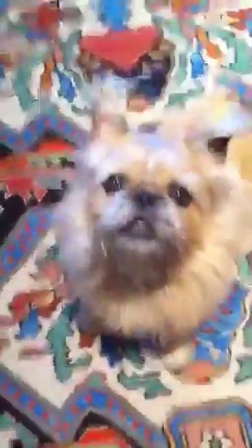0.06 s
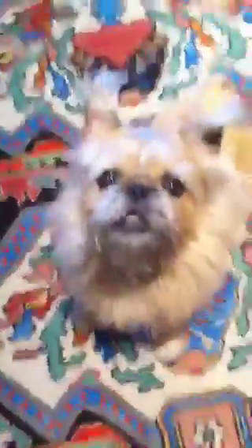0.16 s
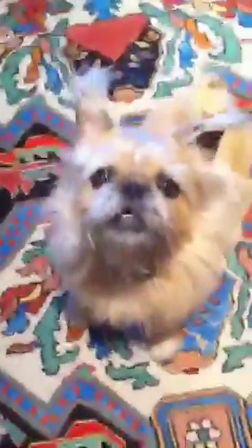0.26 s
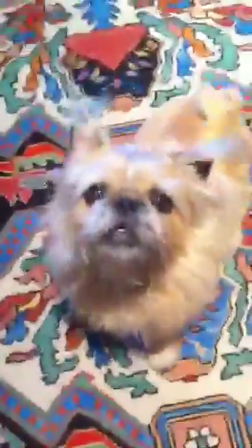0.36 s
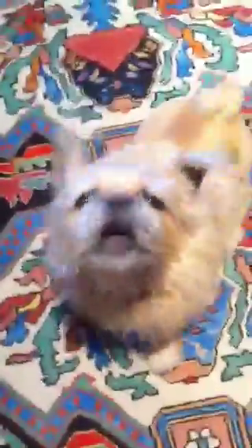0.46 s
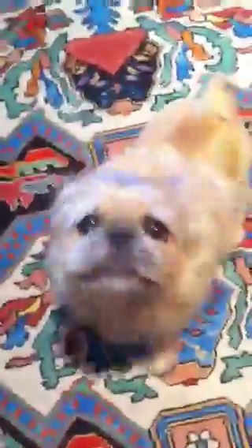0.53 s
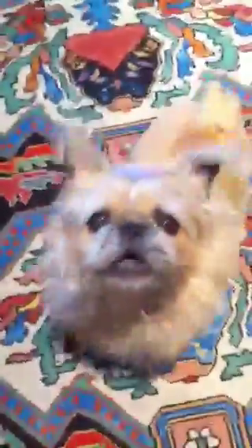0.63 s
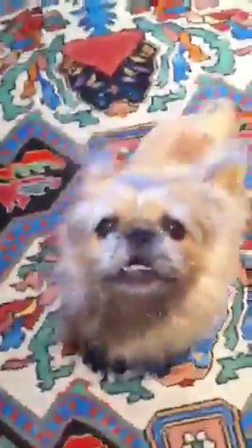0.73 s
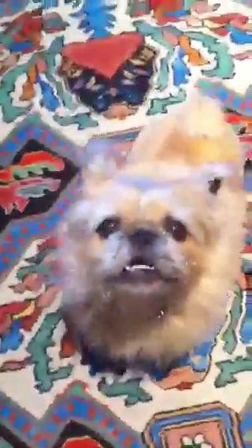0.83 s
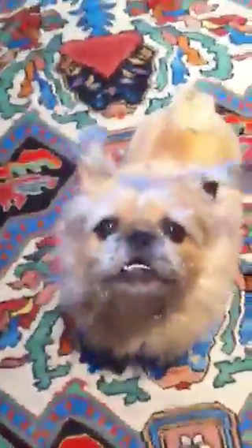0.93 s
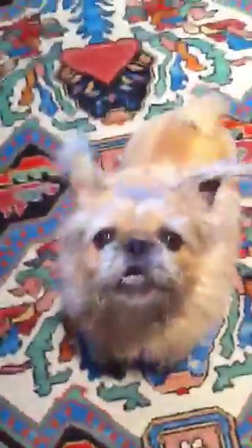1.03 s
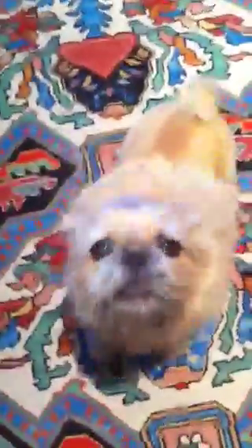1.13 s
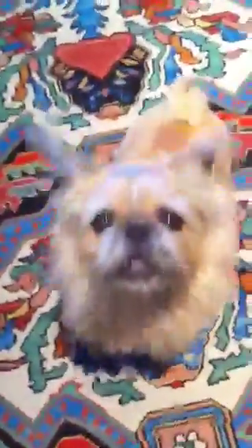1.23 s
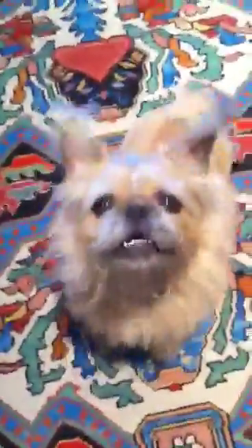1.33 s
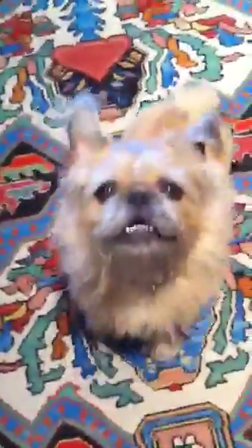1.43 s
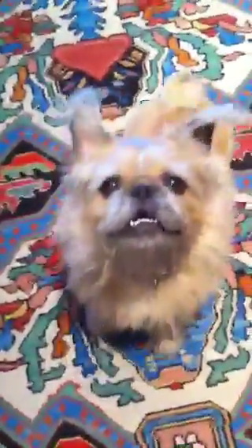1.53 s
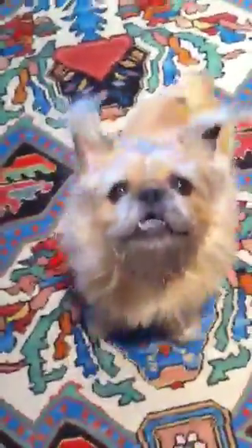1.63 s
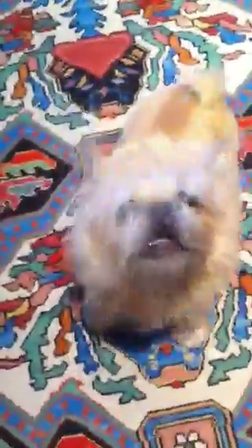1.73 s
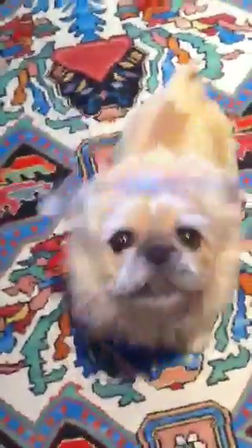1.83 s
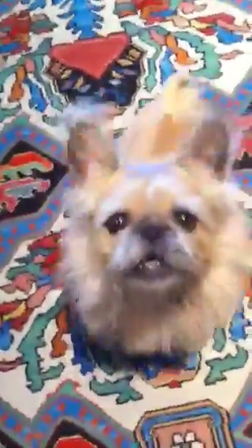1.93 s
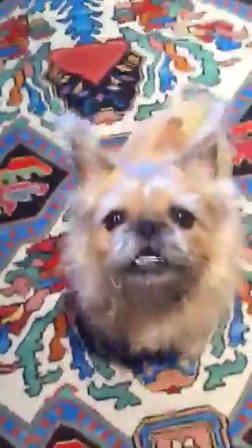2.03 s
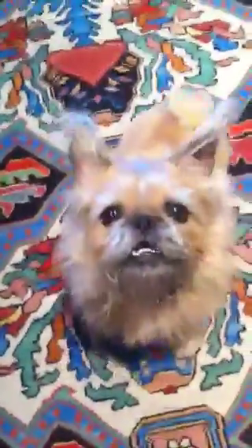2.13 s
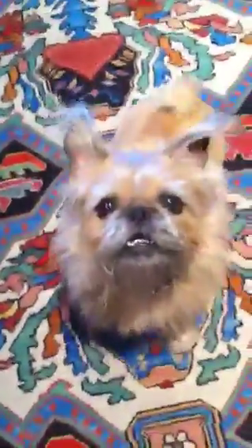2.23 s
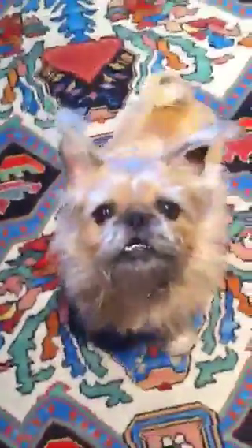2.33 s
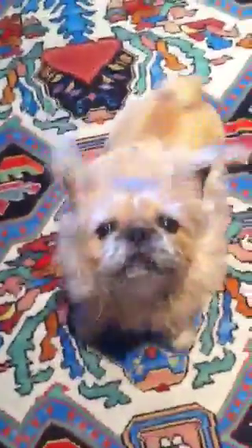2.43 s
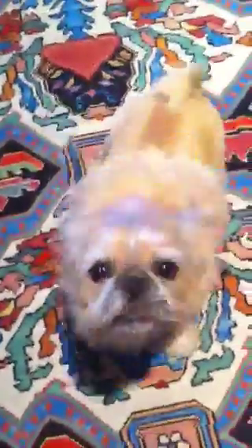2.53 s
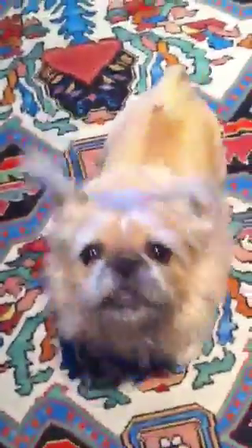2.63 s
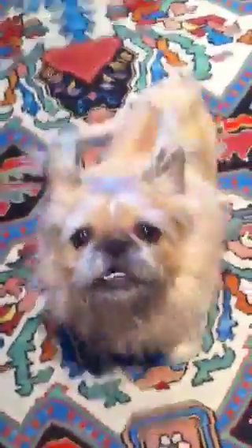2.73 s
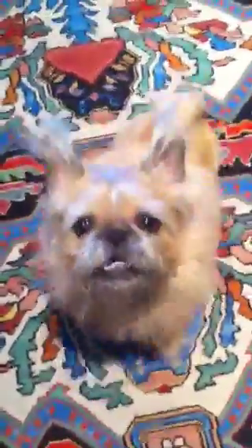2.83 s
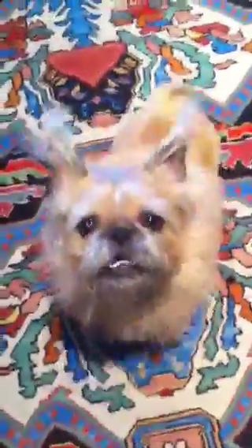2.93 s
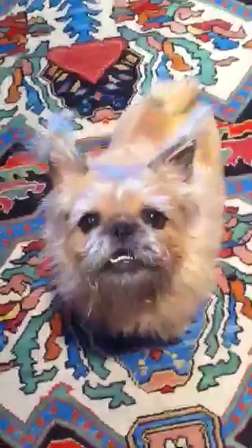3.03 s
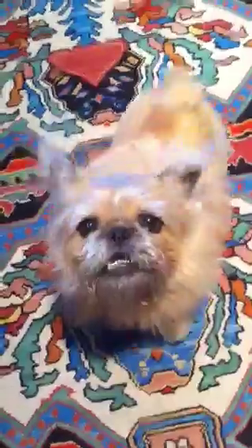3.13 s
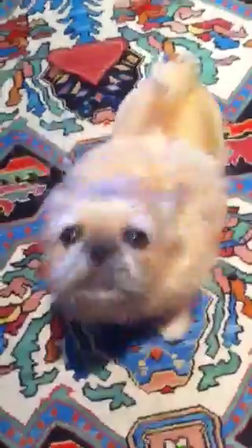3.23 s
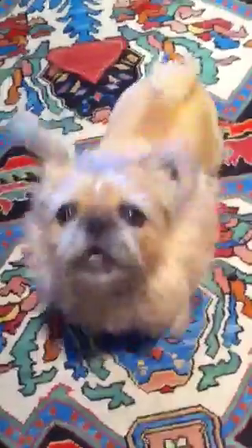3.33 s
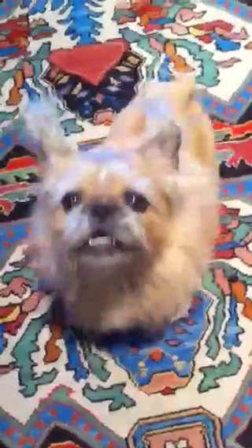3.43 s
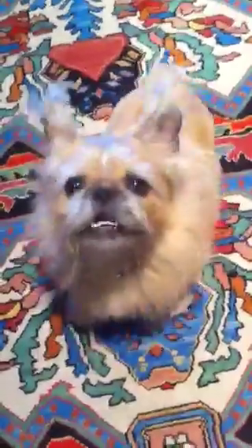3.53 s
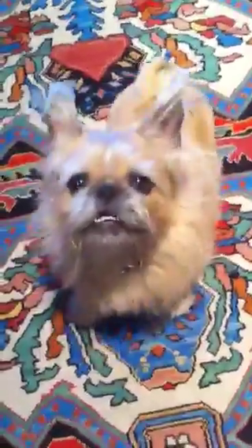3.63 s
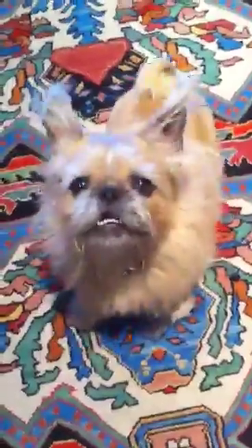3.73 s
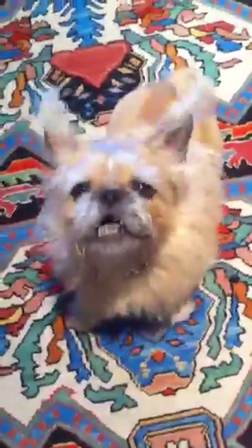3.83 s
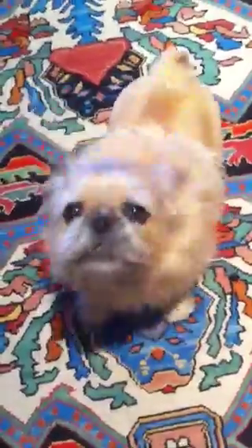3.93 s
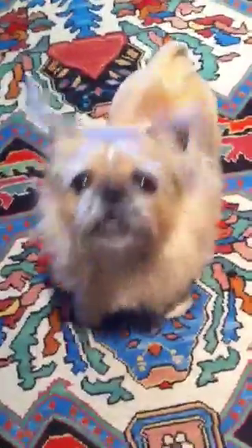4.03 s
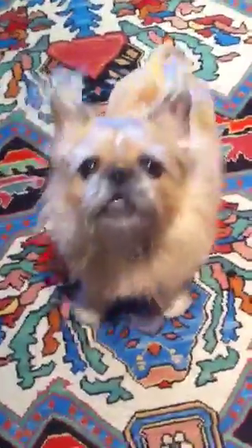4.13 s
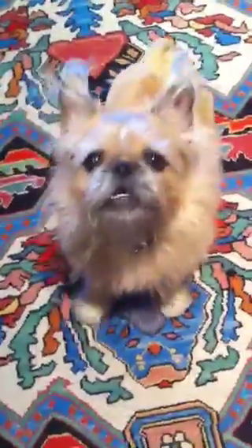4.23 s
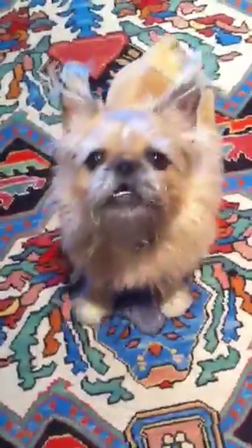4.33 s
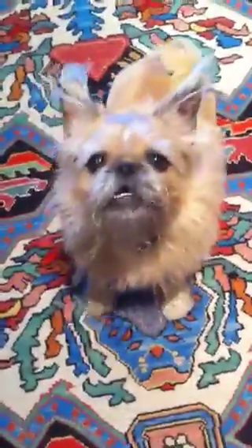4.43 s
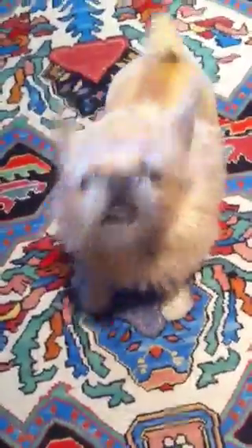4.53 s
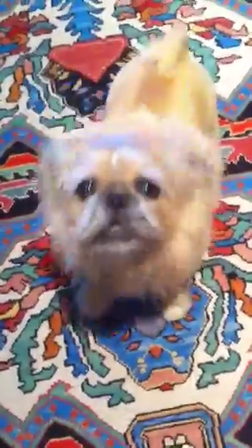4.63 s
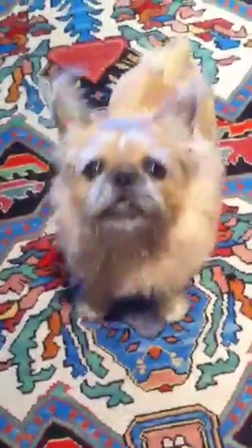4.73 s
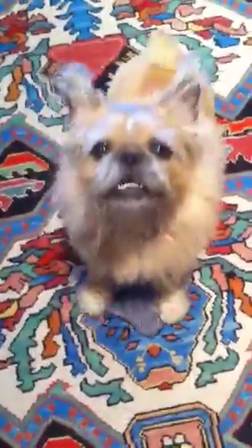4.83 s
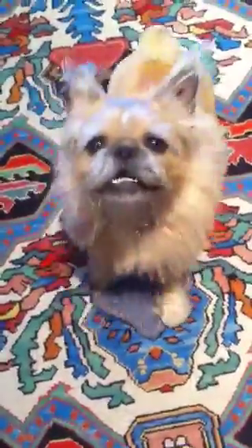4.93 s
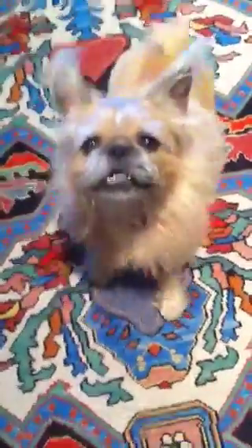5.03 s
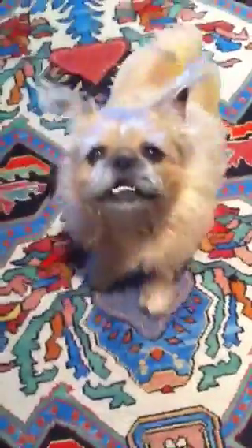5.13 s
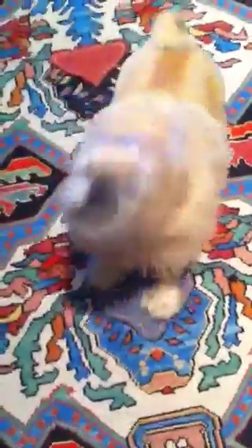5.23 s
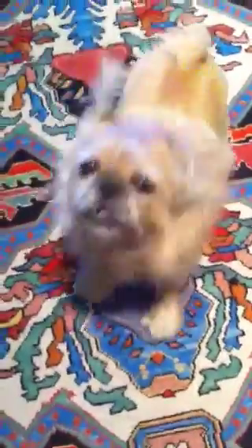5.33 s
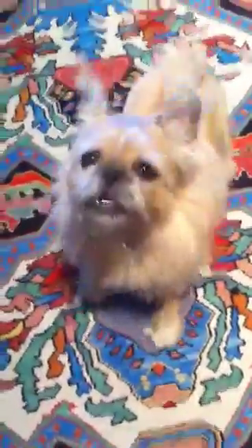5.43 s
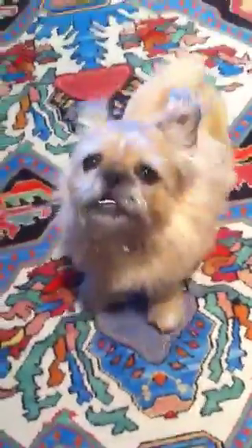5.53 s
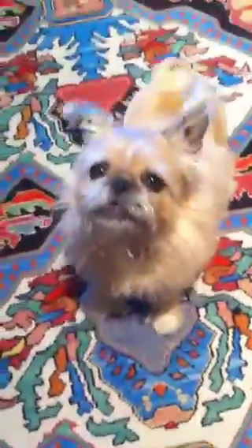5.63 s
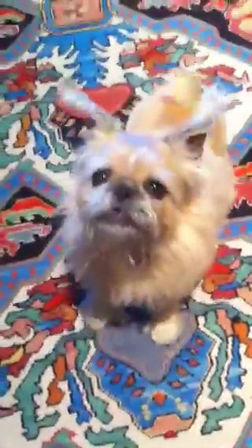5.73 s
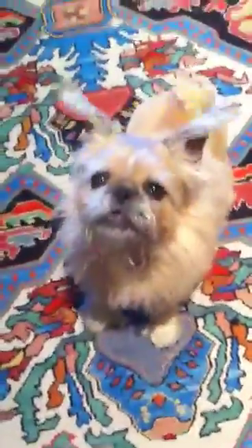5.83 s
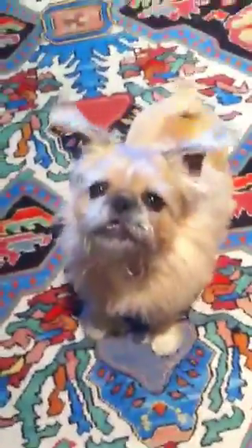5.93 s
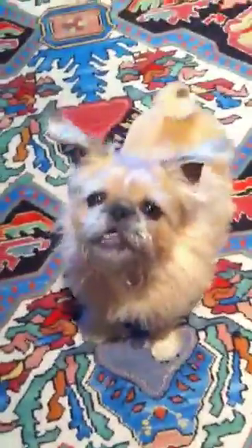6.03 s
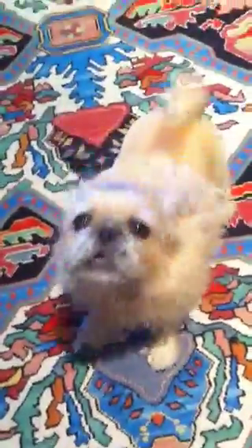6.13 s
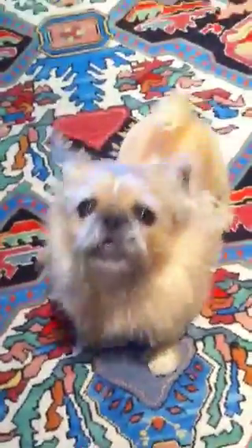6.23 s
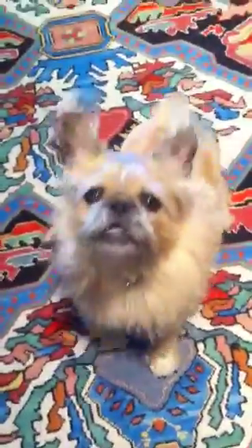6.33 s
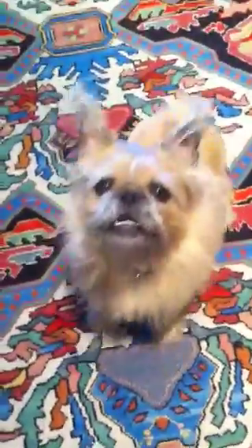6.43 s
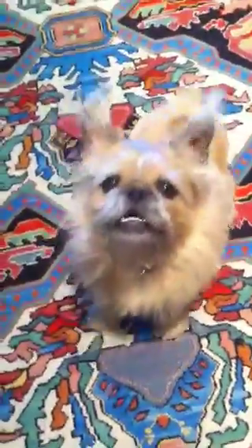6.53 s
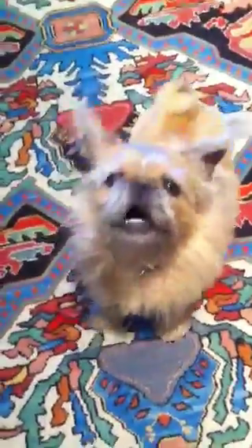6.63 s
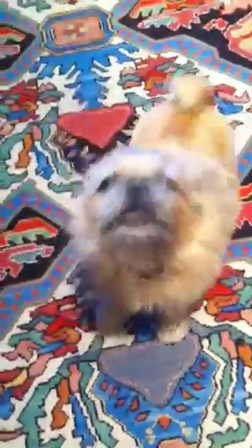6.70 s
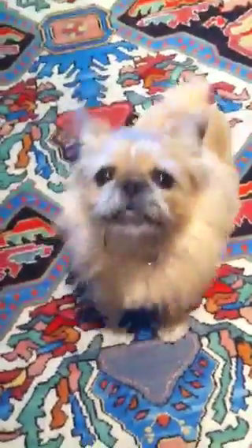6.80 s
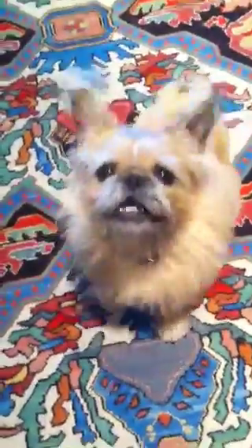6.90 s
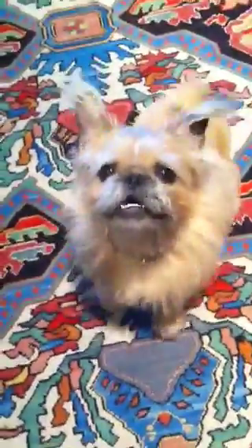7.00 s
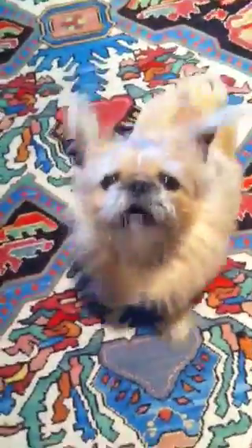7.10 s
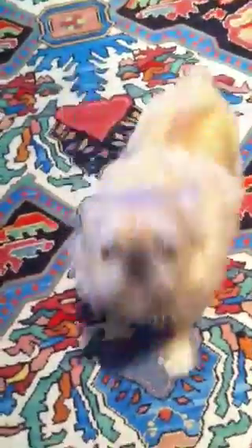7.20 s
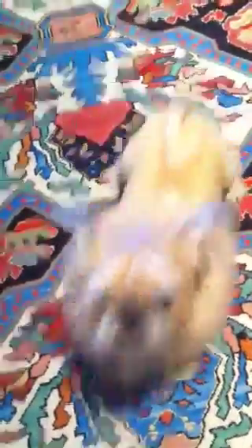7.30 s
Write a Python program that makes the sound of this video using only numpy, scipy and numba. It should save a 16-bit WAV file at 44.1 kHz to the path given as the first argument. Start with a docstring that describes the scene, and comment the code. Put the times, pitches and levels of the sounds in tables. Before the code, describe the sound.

A small flat-faced dog barks sharply and hoarsely eleven times in a live room, with thin squeaks before most barks and soft rug rustling.

```python
"""A tail from a bark just before the start opens the scene; brushing noise and a room hum run throughout.
From 0.4 to 5 s seven thin reedy squeaks (partial stacks) come close up, most leading into a bark.
From 0.55 s a small flat-faced dog barks eleven times in a live, hard-walled room: pulses ring throat and mouth.
From 0.9 s snuffles (noise through nasal resonances) and dull paw taps fill gaps; peaks are squeezed flat."""
import sys
import numpy as np
from scipy import signal
from scipy.fft import rfft, irfft
from scipy.io import wavfile
from scipy.ndimage import uniform_filter1d
from numba import njit

SR = 44100
rng = np.random.default_rng(int(sys.argv[2]) if len(sys.argv) > 2 else 0)


def master_out(mix):
    """Clip the mix to full scale and print it as 16-bit PCM to the path in sys.argv[1]."""
    frames = np.transpose(np.atleast_2d(mix))
    ceiling = np.clip(frames, -1, 1)
    pcm = np.round(ceiling * 32767).astype(np.int16)
    wavfile.write(sys.argv[1], SR, pcm)


def field_ratio(decibels):
    """Amplitude ratio for a level in dB (20 dB per decade); scalars and array-likes work."""
    return 10 ** (np.asarray(decibels, dtype=float) / 20)


N = 324576
LEAD = SR // 2    # samples computed ahead of the start

# barks: (time [s], fade from end of low-bark climb to end of bark [dB], pitch after opening climb [Hz],
#         closing throat resonance [Hz], gape [0-1])
BARKS = [(0.55, -9.5, 487.1, 867.5, 0.29), (1.172, -20, 488, 1201, 0.3), (1.814, -14, 514, 1173, 0.64),
         (2.549, -6, 930, 1177, 0.55), (3.284, -13.5, 953.4, 904, 1), (3.959, -9, 498.8, 1212, 0.39),
         (4.612, -10, 500.5, 913.3, 0.31), (5.302, -12.5, 581, 1193, 0.94), (6.174, -7.5, 486, 857, .4),
         (6.751, -6, 501, 1155, .7), (7.221, -6.5, 765, 1136, .8)]
# fixed throat resonances: (centre [Hz], width per pass [Hz], level before edge or chest lift [dB])
THROAT_MODES = [(617.8, 128, -5.5), (737.6, 328, -6.5), (3310, 1360, -9), (4250, 5900, -49)]
# upper resonance sinking as the jaws close: (time into bark [s], centre [Hz])
EDGE_FALL = [(.025, 3000), (.06, 2300)]
# air hissing past the teeth: (mean centre [Hz], level before roughness and flutter [dB])
RASP = [(6200, -41.5), (8600, -36.5), (11000, -39.5), (13500, -40.5)]
# squeaks: (time [s], length [s], top pitch [Hz], end pitch [Hz], sag exponent [1 usual, more = earlier])
SQUEAKS = [(0.394, .078, 1239, 1055, 1), (1.417, .093, 1428, 1055, 1.3), (2.134, .086, 1185, 1035, .9),
           (2.853, .087, 1287, 1030, .8), (3.651, .069, 1175, 1045, 1), (4.36, .09, 1290, 1075, 1),
           (4.991, .099, 1180, 1080, 3.5)]
# squeak course after its start: (share of length [0-1], share of way from end to top pitch [0-1],
#                                 level re squeak peak [dB])
SQUEEZE = [(.21, 1, 0), (.45, .74, -1), (.72, .34, -3), (1, 0, -11)]
# squeak colour: (frequency [Hz], relative level [dB])
REED_COLOUR = [(1000, 11), (1500, 0), (2400, -26), (3600, -9), (4700, 2.5), (6200, -13.5), (8300, -2.5),
               (10000, -17.5), (12000, -6.5), (15500, -23.5)]
# snuffles through the short nose: (time [s], length [s], level before ramps [dB])
SNUFFLES = [(0.898, 0.29, -77), (1.72, 0.18, -58.5), (2.365, 0.12, -56.5), (3.138, 0.14, -49)]
# nasal resonances: (centre [Hz], width per pass [Hz], relative level [dB])
NOSE_MODES = [(1214, 600, -10), (2000, 700, -9), (2650, 500, -9), (3400, 700, -8)]
# fur and paws on the rug: (time [s], length [s], level before flutter [dB])
RUSTLES = [(0.28, 0.63, -58.5), (0.78, 0.46, -56.5), (1.156, 0.55, -59), (1.527, .4, -59),
           (1.901, 0.16, -57), (2.579, 0.35, -56), (2.9, 0.47, -60), (3.327, .3, -57.5), (4.065, 0.34, -69),
           (4.689, 0.33, -56.5), (4.98, .36, -55.5), (5.51, 0.29, -64.5), (5.9, 0.15, -73),
           (6.257, 0.29, -54), (6.531, 0.22, -60), (7.088, 0.15, -61.5)]
# rustle spectrum: (frequency [Hz], relative density [dB per Hz])
RUSTLE_COLOUR = [(900, -23), (1500, 5.5), (2300, 5), (4200, -6), (7700, -6), (16000, -8)]
# paw taps: (time [s], peak level [dB], lower resonance [Hz])
TAPS = [(0.897, -34.5, 860), (5.15, -41, 2370), (5.194, -40.5, 735), (5.252, -40, 730),
        (6.028, -52.5, 1150), (6.667, -34, 780)]
# hum spectrum: (frequency [Hz], relative density [dB per Hz])
HUM_COLOUR = [(30, -30.5), (90, -18), (120, 1.4), (150, -6), (260, -5.5), (420, -5.5), (1100, -13.5),
              (1500, -25), (3000, -45.5)]
# room decay: (frequency [Hz], time to fall 60 dB [s])
ROOM_T60 = [(250, 0.56), (550, 0.76), (1200, 0.75), (2500, 0.6), (5000, 0.52), (12000, 0.34)]

EARLIER_BARK_S, EARLIER_BARK_DB = -0.78, -2    # copy of the first bark's settings, re that bark
BARK_S, BARK_DB = 0.096, -9
LOW_CLIMB_S, SETTLE_S, SHUT_S = .028, .054, .075    # low bark: climb ends, half settled, settled
HIGH_CLIMB_S, BREAK_S, CLEAR_S = .029, .038, .022    # high bark: climb ends, pitch breaks, roughening delay
BREAK_HZ, SLOW_START_DB, CLIMB_EDGE_DB = 650, -9, 9    # barks climbing above this start softly, sharp, clear
START_SHARE, START_MAX_HZ = .86, 513.2    # starting pitch: share of climbed pitch, limit
SETTLED_SHARE = .51    # settled pitch re closing throat resonance
THROAT_START_SHARE, THROAT_LOCK, THROAT_MIN_HZ = 0.915, 0.95, 930
MOUTH_SHUT_HZ, MOUTH_GAPE_HZ = 1390, 810    # shut, and lift at full gape
EDGE_DB, EDGE_GAPE_DB, EDGE_FADE_DB = -14.5, 7, -6.5    # base, lift at full gape, change over the bark
REED_DB, REED_DB_PER_HZ, REED_MAX_DB = -43.5, 0.14, -38    # before colour; harder squeeze = higher, louder
REED_START_HZ, REED_START_SHARE, REED_START_DB = 1160, .3, -3
STILL_DB, STROKE_RAMP_SHARE = -69, .45    # rustle between strokes; share of a stroke in each ramp
HUM_DB, ROOM_DB, SQUEAK_ROOM_DB = -61.5, -14.5, -13    # near squeak sends less to the room


def at_hz(points, hz):
    """Read a (Hz, value) table on a log frequency axis."""
    return np.interp(np.log(hz), np.log(np.array(points)[:, 0]), np.array(points)[:, 1])


def rms_one(x):
    """Scale to unit rms."""
    return x / np.sqrt(np.mean(x ** 2) + 1e-20)


def unfold(rows):
    """First sample index and a per-sample curve for each column after time."""
    s, *columns = np.transpose(rows)
    t = np.arange(s[0], s[-1], 1 / SR)
    return round(s[0] * SR) + LEAD, [np.interp(t, s, c) for c in columns]


def wobble(size, hz):
    """Unit-rms noise through two equal low-pass poles at hz."""
    r = np.exp(-2 * np.pi * hz / SR)
    noise = rng.standard_normal(size + 3000)
    return rms_one(signal.lfilter([1], [1, -2 * r, r * r], noise)[3000:])


def coloured(spectrum):
    """Unit-rms noise of the given spectral density."""
    hz = np.maximum(np.fft.rfftfreq(N + LEAD, 1 / SR), 1)
    white = rfft(rng.standard_normal(N + LEAD))
    return rms_one(irfft(white * field_ratio(at_hz(spectrum, hz)), N + LEAD))


def ramps(size, rise_s, fall_s):
    """Sine-squared rise and fall."""
    t = np.arange(size) / SR
    return np.sin(np.pi / 2 * np.clip(np.minimum(t / rise_s, t[::-1] / fall_s), 0, 1)) ** 2


@njit
def resonate(x, hz, width_hz):
    """Two-pole resonance with a moving centre, about unit gain at its peak."""
    y, r = np.zeros(len(x)), np.exp(-np.pi * width_hz / SR)
    for i in range(2, len(x)):
        drive = (1 - r * r) / 2 * (x[i] - x[i - 2])
        y[i] = drive + 2 * r * np.cos(2 * np.pi * hz[i] / SR) * y[i - 1] - r * r * y[i - 2]
    return y


def ring_twice(x, hz, width_hz):
    """Steep fixed resonance: two equal passes."""
    centre_hz = np.full(len(x), float(hz))
    once = resonate(x, centre_hz, float(width_hz))
    return resonate(once, centre_hz, float(width_hz))


def dog():
    """Place all barks; each is a burst of fold pulses shaped by a closing mouth."""
    out = np.zeros(N + LEAD)
    first_s, *first = BARKS[0]
    for k, row in enumerate([(first_s + EARLIER_BARK_S, *first)] + list(BARKS)):
        rows, clear_s = bark_controls(*row)
        start, columns = unfold(rows)
        out[start:start + len(columns[0])] += bark(*columns, clear_s) * field_ratio(EARLIER_BARK_DB * (k == 0))
    return out


def bark_controls(s, fade_db, climbed_hz, closing_hz, gape):
    """Curves of one bark: pitch climbs, then glides to a settled pitch, lower or higher; gape lifts mouth."""
    high = climbed_hz > BREAK_HZ
    low_times = [0, LOW_CLIMB_S, SETTLE_S, SHUT_S, BARK_S]
    t = np.array([0, HIGH_CLIMB_S, BREAK_S, SETTLE_S, BARK_S] if high else low_times)
    after = np.clip((t - LOW_CLIMB_S) / (BARK_S - LOW_CLIMB_S), 0, 1)
    level_db = BARK_DB + fade_db * after + SLOW_START_DB * high * (t == 0)

    settled_hz = SETTLED_SHARE * closing_hz
    start_hz = min(START_SHARE * climbed_hz, START_MAX_HZ)
    third_hz = climbed_hz if high else (climbed_hz + settled_hz) / 2
    pitch_hz = [start_hz, climbed_hz, third_hz, settled_hz, settled_hz]

    partial_hz = climbed_hz * (1 if high else 2)    # the throat follows this partial
    open_hz = max(THROAT_LOCK * partial_hz, THROAT_MIN_HZ)
    throat_hz = [THROAT_START_SHARE * open_hz, open_hz, (open_hz + closing_hz) / 2, closing_hz, closing_hz]

    mouth_hz = MOUTH_SHUT_HZ + MOUTH_GAPE_HZ * gape * np.clip(1 - t / SHUT_S, 0, 1) ** 0.47
    edge_db = EDGE_DB + EDGE_GAPE_DB * gape + EDGE_FADE_DB * t / BARK_S
    edge_db = edge_db + CLIMB_EDGE_DB * high * (t == 0)
    return np.transpose([s + t, level_db, pitch_hz, throat_hz, mouth_hz, edge_db]), CLEAR_S * high


def bark(level_db, pitch_hz, throat_hz, mouth_hz, edge_db, clear_s):
    """Vocal-fold pulses, clear at first and then chaotic, ring the throat and the mouth."""
    size = len(pitch_hz)
    t = np.arange(size) / SR
    rough = np.clip(.2 + (t - clear_s) / .05, .15, .9)    # the folds lose their beat
    folds, breath = fold_source(pitch_hz, rough)

    voice = resonate(folds, throat_hz, 140.)
    voice -= field_ratio(-13 + 5.5 * rough) * resonate(folds, mouth_hz, 420.0)
    edge_hz = np.interp(t, *np.transpose(EDGE_FALL))
    voice += field_ratio(edge_db - 7.5 + 9.5 * rough) * resonate(folds, edge_hz, 170.0)
    for hz, width_hz, db in THROAT_MODES:
        lift_db = edge_db - 5 if hz > 2300 else 8 * rough - 7    # edge above; the chest joins late
        voice += field_ratio(db + lift_db) * ring_twice(folds, hz, width_hz)
    voice = signal.sosfilt(signal.butter(6, 4600, fs=SR, output="sos"), voice)
    voice = signal.sosfilt(signal.butter(5, 480, "high", fs=SR, output="sos"), voice)

    running_rms = np.sqrt(uniform_filter1d(voice ** 2, size=700) + 1e-12)
    sound = voice / running_rms + teeth_hiss(breath, rough)
    return sound * field_ratio(level_db) * ramps(size, 0.019, 0.0099)


def fold_source(pitch_hz, rough):
    """Fold pulses and their breath; half-way partials grow as the cycles pair up."""
    size = len(pitch_hz)
    cycles = np.cumsum(pitch_hz * (1 + 0.0904 * rough * wobble(size, 125.5))) / SR

    def partial(k):
        """One partial swelling and fading on its own."""
        swell = field_ratio(6.0 * rough * wobble(size, 45))
        return swell * np.sin(2 * np.pi * (k * cycles + .25 + rough * rng.normal(0, .6)))

    pulses = sum(partial(k) + field_ratio(-12.0 + 14.5 * rough) * partial(k + .5) for k in range(1, 12))
    breath = rng.standard_normal(size) * (1 + 1.3 * np.cos(2 * np.pi * cycles))    # a puff each cycle
    return rms_one(pulses) + .18 * rough * breath, breath


def teeth_hiss(breath, rough):
    """Breath in resonant bands that lips and tongue shift about."""
    size, rasp = len(breath), 0
    for hz, db in RASP:
        centre_hz = hz * (1 + .05 * wobble(size, 15))
        hiss = resonate(resonate(breath, centre_hz, hz / 4), centre_hz, hz / 4)
        rasp = rasp + field_ratio(db - 3 + 5.5 * rough + 3.5 * wobble(size, 26)) * rms_one(hiss)
    return rasp


def squeaks():
    """A small reed: a clean stack of partials through a fixed colour, with a little air noise."""
    out = np.zeros(N + LEAD)
    for row in SQUEAKS:
        start, (pitch_hz, level_db) = unfold(squeeze(*row))
        size = len(pitch_hz)
        smooth_hz = uniform_filter1d(pitch_hz, size=500, mode="nearest")
        pitch_hz = smooth_hz * (1 + .004 * wobble(size, 25) + .004 * wobble(size, 250))
        phase = 2 * np.pi * np.cumsum(pitch_hz) / SR
        stack = np.sin(phase) * field_ratio(at_hz(REED_COLOUR, pitch_hz))
        for k in range(2, 14):
            partial_db = at_hz(REED_COLOUR, k * pitch_hz) + 2.94 * wobble(size, 44)
            stack += field_ratio(partial_db) * np.sin(k * phase)
        air = field_ratio(-8) * ring_twice(rng.standard_normal(size), 9000, 14000)
        out[start:start + size] += (stack + air) * field_ratio(level_db) * ramps(size, 0.0021, 0.0017)
    return out


def squeeze(s, length_s, top_hz, end_hz, sag):
    """Pitch and level of one squeak; a harder squeeze starts only a little higher."""
    start_hz = REED_START_HZ + REED_START_SHARE * (top_hz - REED_START_HZ)
    peak_db = min(REED_DB + REED_DB_PER_HZ * (top_hz - REED_START_HZ), REED_MAX_DB)
    rows = [(s, start_hz, peak_db + REED_START_DB)]
    for when, share, below_db in SQUEEZE:
        pitch_hz = end_hz + max(share, 0) ** sag * (top_hz - end_hz)
        rows.append((s + when * length_s, pitch_hz, peak_db + below_db))
    return rows


def snuffles():
    """Short breaths: noise ringing the nasal passages."""
    out = np.zeros(N + LEAD)
    for s, length_s, db in SNUFFLES:
        size = int(length_s * SR)
        air = rng.standard_normal(SR // 2)[:size]
        breath = sum(field_ratio(mode_db) * ring_twice(air, hz, width_hz) for hz, width_hz, mode_db in NOSE_MODES)
        out[round(s * SR) + LEAD:][:size] += field_ratio(db) * rms_one(breath) * ramps(size, 0.039, 0.022)
    return out


def rustle():
    """Fur and paws brushing the rug: coloured noise in fluttering strokes."""
    level = np.full(N + LEAD, field_ratio(STILL_DB))
    for s, length_s, db in RUSTLES:
        size, ramp_s = int(length_s * SR), STROKE_RAMP_SHARE * length_s
        level[round(s * SR) + LEAD:][:size] += field_ratio(db) * ramps(size, ramp_s, ramp_s)
    return coloured(RUSTLE_COLOUR) * level * field_ratio(1.4 * wobble(N + LEAD, 30))


def paw_taps():
    """Short dull taps: decaying noise puffs through two resonances."""
    out = np.zeros(N + LEAD)
    t = np.arange(2000) / SR
    for s, db, hz in TAPS:
        puff = rng.standard_normal(2000) * t * np.exp(-t / 0.007)
        puff = ring_twice(puff, hz, 710) + field_ratio(-6) * ring_twice(puff, 2.4 * hz, 970)
        out[round(s * SR) + LEAD:][:2000] += field_ratio(db) * puff / np.abs(puff).max()
    return out


def room(x):
    """Dense reflections: noise that dies at its own rate in each half-octave band."""
    t, echo = np.arange(SR) / SR, 0
    edges_hz = 150 * 2 ** np.arange(0, 7, .5)
    for low_hz, high_hz in zip(edges_hz, edges_hz[1:]):
        band_filter = signal.butter(2, [low_hz, high_hz], "band", fs=SR, output="sos")
        band = signal.sosfilt(band_filter, rng.standard_normal(SR))
        echo = echo + band * field_ratio(-60 * t / at_hz(ROOM_T60, np.sqrt(low_hz * high_hz)))
    echo = echo * np.clip(t / 0.0013, 0, 1)    # reflections build up over 1.3 ms
    return field_ratio(ROOM_DB) * signal.fftconvolve(x, rms_one(echo) / np.sqrt(SR))[:len(x)]


def hum():
    """Faint room hum: steady noise weighted to the low end."""
    return field_ratio(HUM_DB) * coloured(HUM_COLOUR)


def scene():
    """Barks and squeaks in the room, over snuffles, rustle, taps and hum."""
    barks, near = dog(), squeaks()
    reflected = room(barks + field_ratio(SQUEAK_ROOM_DB) * near)
    mix = barks + near + reflected + snuffles() + rustle() + paw_taps() + hum()
    return mix[None, LEAD:]


def top_cut(x):
    """Nothing passes above the cut-off."""
    return signal.sosfilt(signal.butter(12, 16470, fs=SR, output="sos"), x)


def record(dry):
    """Squeeze peaks against a ceiling, then cut rumble and the highest treble."""
    ceiling = .72
    mix = dry / (1 + (dry / ceiling) ** 6) ** (1 / 6)
    mix = signal.sosfilt(signal.butter(1, 70, "high", fs=SR, output="sos"), mix)
    mix = signal.sosfilt(signal.cheby2(10, 60, 17000, fs=SR, output="sos"), mix)
    return top_cut(mix)


dry = scene()
out = record(dry)
master_out(out)
```